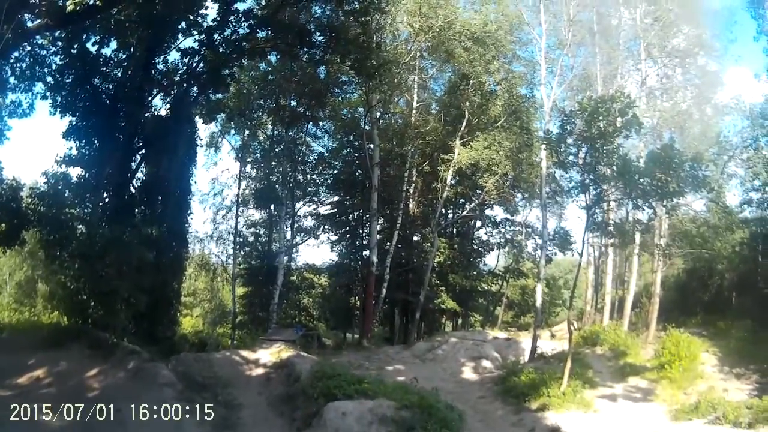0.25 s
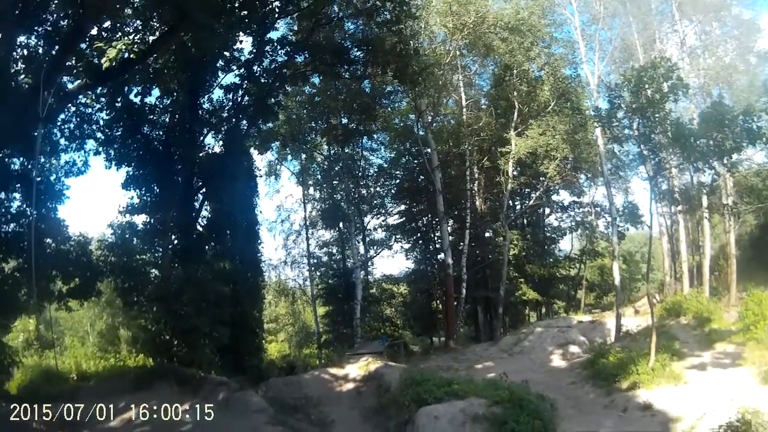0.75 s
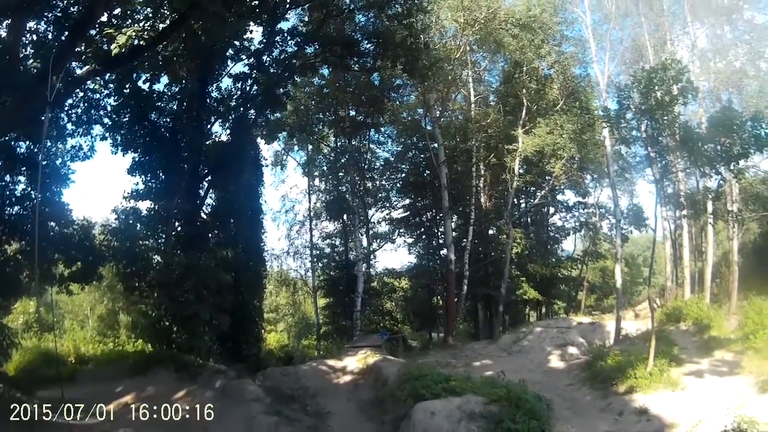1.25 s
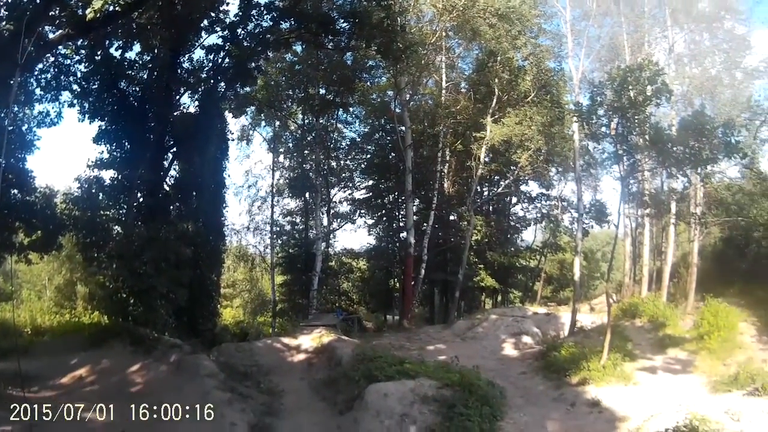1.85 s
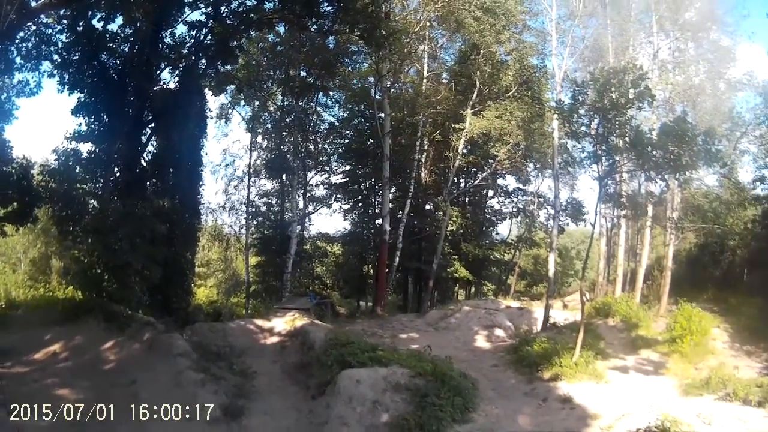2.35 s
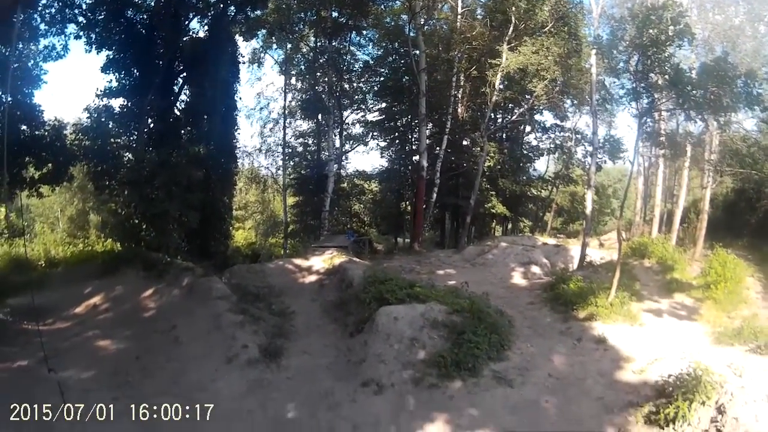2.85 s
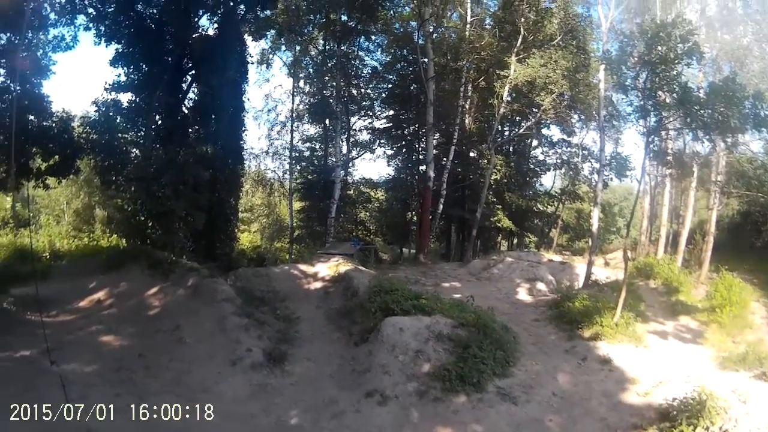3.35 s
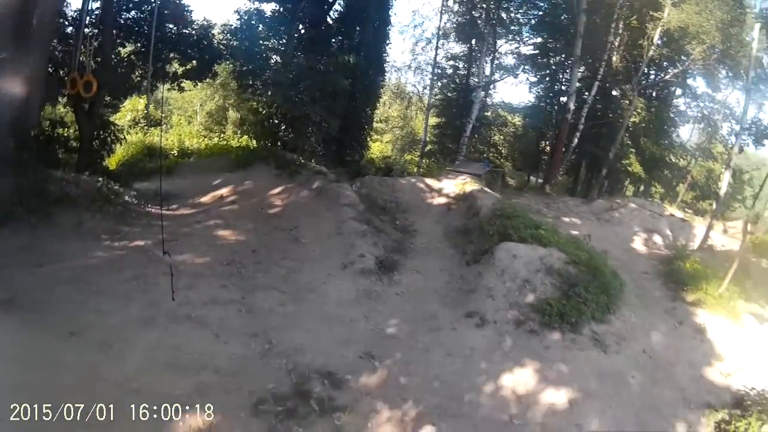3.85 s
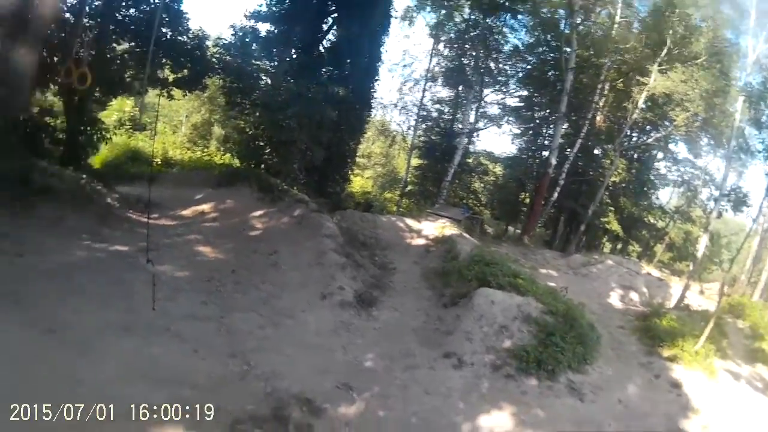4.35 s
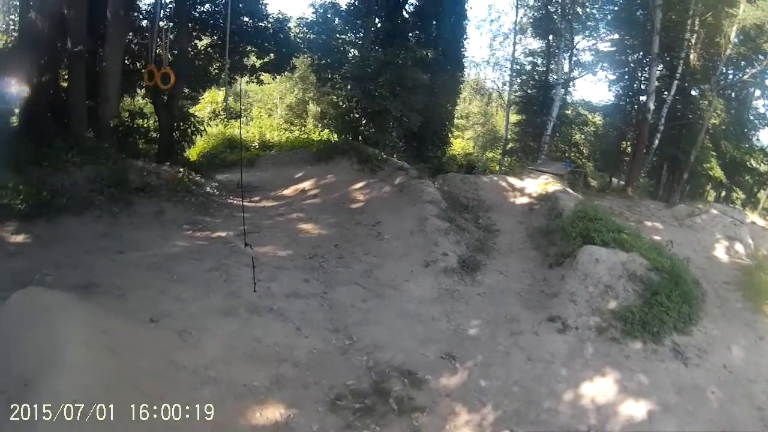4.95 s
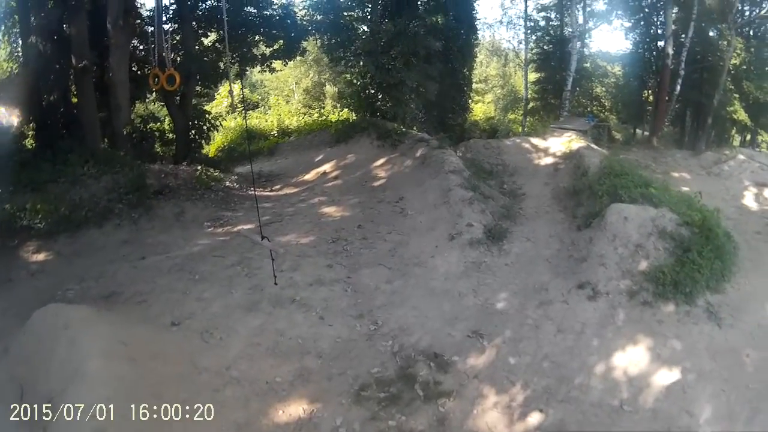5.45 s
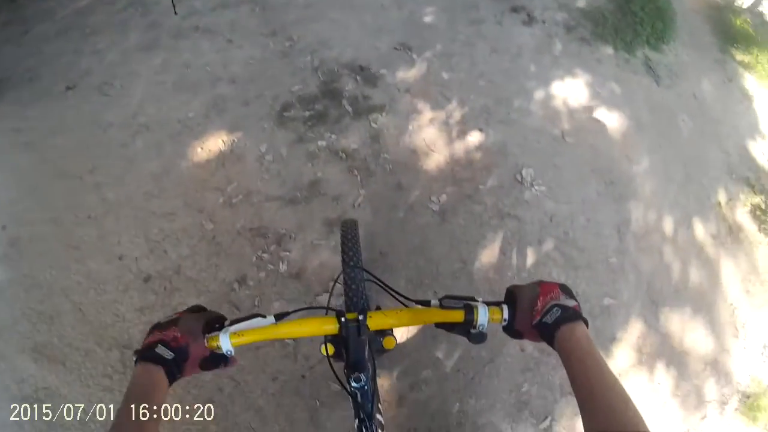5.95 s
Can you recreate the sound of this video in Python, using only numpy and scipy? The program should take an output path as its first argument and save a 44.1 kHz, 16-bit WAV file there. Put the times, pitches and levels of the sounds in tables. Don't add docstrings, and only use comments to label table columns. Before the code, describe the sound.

A close, dry, bumpy handling sound from a microphone inside a helmet-mounted camera on a bike ride in woods. Low rumble, strap rubbing and steady hiss run throughout, with a very thin high whine and a faint fizzing buzz about once a second. From 0.4 to 0.9 s, plastic knocks and ticks tumble over soft low thuds. After a lighter stretch, a heavy boom with a hard knock and bright tick lands at 1.6 s. Smaller rattles follow around 2 s, then a short, deep thump with scuff at 2.65 s. It is quieter near 3 s, with faint distant bird whistles between about 1.7 and 3.9 s. Firm knocks and thuds return at 3.4-3.6 s, then clatter from 4.25 to 4.8 s. The sharpest double crack comes at 5.04 s. Taps and small bumps thin out, one last knock falls at 5.95 s, and it settles.

```python
import sys
import numpy as np
from scipy import signal
from scipy.fft import rfft, irfft
from scipy.io import wavfile
from scipy.ndimage import uniform_filter1d

SR = 44100
rng = np.random.default_rng(int(sys.argv[2]) if len(sys.argv) > 2 else 0)


def gain_from_db(level_db):
    decades = np.asarray(level_db, float) / 20
    return 10 ** decades


def unload_wav(signal):
    wavfile.write(
        sys.argv[1],
        SR,
        np.round(np.clip(np.atleast_2d(signal).T, -1, 1) * 32767).astype(np.int16),
    )


N = 273861

# pitch in Hz, width in Hz, level in dB.
HOUSING_MODES = [(1244, 190, 4), (1385, 329, 5.5), (1510, 252, 3.5), (1932, 172, -1.5), (2252, 166, -1.5)]
# pitch in Hz, width in Hz, level in dB.
SHELL_MODES = [(251, 47, 6.5), (374, 100, 3.5), (589.4, 79, 2), (797, 110, 3.5), (953, 46, -3)]
# pitch in Hz, width in Hz, level in dB.
LATCH_MODES = [(3000, 430, -5.5), (3850, 380, -3.5), (4450, 920, -7), (5500, 2000, -3), (7540, 760, -5.5),
               (9876, 280, -9.5), (11200, 11000, -16)]
# time in seconds, level in dB.
RESTLESSNESS = [(0, -44), (0.2, -54), (0.8, -49), (1.2, -56), (1.68, -50), (1.8, -47.5), (1.97, -43.5),
                (2.2, -50.5), (2.55, -48), (2.9, -61), (3.66, -46.5), (3.74, -56), (4.2, -55), (4.4, -47.5),
                (4.6, -47), (5.0, -45), (5.42, -50.5), (6.21, -58)]
# centre in seconds, change in dB, half length in seconds.
STILL_MOMENTS = [(0.313, -6, 0.16), (1.257, -7, 0.055), (2.24, -10, 0.032), (2.464, -8, 0.077),
                 (2.81, -5.5, .06), (3.713, -5.5, 0.052), (4.55, -6, 0.044), (4.84, -11.5, 0.047),
                 (5.513, -17, 0.046), (5.893, -5, 0.047), (6.168, -10, 0.09)]
# centre in seconds, peak in dB, half length in seconds.
STRAP_SCUFFS = [(0.653, -53.5, 1), (1.958, -43.5, 0.075), (0.526, -52, 0.031), (2.65, -38.5, 0.06),
                (4.926, -44, 0.046), (1.641, -38.5, 0.061), (3.63, -52, 0.35), (3.993, -59.5, 0.43),
                (4.352, -48, 0.4), (5, -40, 0.12), (5.411, -47, 0.2)]
# frequency in Hz, density in dB per Hz.
HISS_SPECTRUM = [(100, 5.5), (300, 7.5), (1000, -3.5), (2500, -6.5), (5000, -9), (8000, -9.5), (13000, -10),
                 (15800, -13)]
# crest in seconds, peak in dB, pitch in Hz, rise in ms, fall by 8 dB in ms.
HELMET_THUDS = [(0.404, -29.5, 124, 5, 2.5), (0.473, -21, 73.5, 11, 15), (0.592, -25, 71, 13, 14),
                (0.695, -30.5, 115, 7.5, -1.5), (1.518, -35.5, 99, 20, 12), (1.617, -14, 109.8, 13, 37),
                (1.635, -13, 88, 14, 25), (1.944, -26.5, 95, 8.8, 10), (1.979, -28, 102, 14, 7.5),
                (2.073, -23.5, 102, 12.5, 7), (2.65, -13.5, 115.6, 3.7, 4), (3.39, -26.5, 102, 23, 8),
                (3.44, -19.5, 92.6, 17, 22), (3.579, -14, 86, 11, 22), (4.278, -16.5, 79.5, 41, 10),
                (4.313, -31, 92.3, 66, 46), (4.335, -23.5, 98.4, 1.9, 22), (4.953, -19, 98, 5.2, 12),
                (5.017, -18, 81.6, 19, 18), (5.048, -23.5, 90, 12, 24.5), (5.34, -29.5, 97, 12.6, 13),
                (5.384, -29, 91.4, 17, 26), (2.313, -40, 102.5, 31, 44), (5.959, -32, 108, 20, 26)]
# crest in seconds, peak in dB, pitch in Hz.
HELMET_NODS = [(0.006, -43, 83), (0.122, -36, 110), (0.631, -36, 88.7), (0.716, -39, 115),
               (0.848, -38.5, 114), (1.023, -42.5, 91), (1.303, -41, 102.5), (1.343, -37.5, 103),
               (1.4, -36.5, 100), (1.76, -34, 105), (1.805, -37.5, 105), (2.537, -45, 78.4),
               (2.681, -44, 112), (3.1, -37.5, 93), (3.925, -47.5, 110), (4.131, -39, 88.5),
               (4.632, -38, 121.4), (4.689, -33.5, 67), (4.985, -44, 80.4), (5.213, -34.5, 84),
               (5.587, -41, 79), (5.784, -37.5, 106)]
# start in seconds, peak in dB, brightness in Hz.
BUCKLE_TICKS = [(0.0446, -42, 4300), (0.5015, -37, 5230), (0.6368, -41.5, 3990), (0.68, -33.5, 3050),
                (0.819, -41.5, 3500), (0.844, -42, 3400), (1.1047, -49.5, 5360), (1.607, -37.5, 3720),
                (1.6342, -19, 4575), (1.709, -46, 4210), (1.919, -38.5, 4670), (2.0862, -30.5, 4890),
                (2.3231, -36, 4250), (3.58, -43.5, 3370), (3.591, -32.5, 3040), (3.6245, -27, 4690),
                (4.374, -35, 3060), (4.4768, -37, 3800), (4.627, -35.5, 3880), (5.4413, -49, 5500),
                (4.7863, -33, 3280), (4.944, -33, 3890), (4.9812, -39.5, 3780), (5.0388, -25, 3168),
                (5.3436, -51.5, 5330), (5.1082, -40, 5650), (5.152, -38.5, 4100), (5.58, -38, 4700),
                (5.9556, -35.5, 3850), (0.397, -46.5, 4280), (0.708, -43.5, 4080), (1.468, -54, 5040),
                (2.7172, -50, 5500), (3.226, -55, 3930), (3.429, -41.5, 3550), (4.255, -47, 4660),
                (4.957, -41, 4680), (5.449, -52, 3500), (5.601, -42, 4500), (5.78, -47.5, 3680),
                (1.624, -50, 5000), (1.659, -47, 3500), (2.783, -52, 4530), (2.678, -44, 4500),
                (3.299, -52, 5500), (4.321, -25, 4450), (4.325, -41, 3560), (1.703, -40, 3600),
                (3.546, -43, 4140), (1.612, -51, 4800), (1.667, -49, 3200), (4.948, -52, 4030),
                (2.328, -39, 3320), (2.667, -33, 3800), (0.493, -45, 5330), (2.114, -36, 4320),
                (5.407, -46.5, 4730)]
# start in seconds, peak in dB, brightness in Hz.
FURTHER_TICKS = [(0.3626, -55, 3600), (0.4964, -38, 4920), (0.5054, -48, 4200), (0.7134, -45, 3400),
                 (0.8604, -52, 3800), (1.6494, -41, 4300), (0.758, -47, 4920), (1.8711, -51, 3700),
                 (1.9994, -43, 4760), (2.0204, -50, 3730), (2.0685, -48, 5230), (2.0734, -47, 3700),
                 (2.166, -55, 3820), (2.6574, -42, 4500), (4.6334, -34, 4100), (5.1644, -53, 4300),
                 (5.2769, -48, 3300), (0.7795, -47, 4860)]
# start in seconds, peak in dB, length in ms, tick level in dB against the knock.
LATCH_RATTLES = [(0.473, -41, 2.7, -5), (0.4905, -39.5, 12, 9.5), (0.724, -40, 5.9, -2),
                 (0.755, -34.5, 5.7, -5.5), (0.777, -47, 6.4, 4), (1.649, -39.5, 11.5, -7),
                 (1.6962, -38, 5.7, 8), (1.958, -50, 0.67, 0), (1.9995, -36, 2.1, -9),
                 (2.1085, -34.5, 4.2, 7), (2.1441, -34, 6.9, -7), (2.3162, -35.5, 8.4, 5),
                 (2.6501, -32.5, 5.8, 2), (2.6602, -29, 6.77, 7), (3.1173, -42, 2.4, -4),
                 (3.391, -32, 4.3, 7.5), (3.54, -37, 1.6, -3), (3.565, -35.5, 6.5, 1),
                 (3.629, -42, 1.95, -4), (4.2642, -33.5, 2.3, 8), (4.3198, -30.5, 2.7, 0.5),
                 (4.3278, -30.5, 11, -1), (4.5223, -33, 3, -8), (4.537, -34, 5.6, -8.5),
                 (4.7114, -37, 1.4, -5), (4.7772, -31.5, 2.96, -6), (4.965, -37, 2, -2),
                 (5.145, -35.5, 3.64, 5.5), (5.409, -48, 1.6, -22), (5.5703, -36.5, 12.5, -11.5)]
# start in seconds, peak in dB, loudest part in Hz.
STRAP_TAPS = [(0.045, -40, 1790), (0.361, -45, 1580), (0.602, -42, 1310), (0.645, -38, 2090),
              (1.056, -41.5, 1410), (1.115, -40, 1470), (1.177, -39, 1400), (1.439, -38, 1880),
              (1.501, -36, 1300), (1.656, -39, 1460), (1.678, -37, 1780), (1.742, -39, 1480),
              (1.751, -36.5, 1455), (1.805, -40, 1820), (2.097, -37, 1930), (2.165, -41, 1440),
              (2.292, -48, 1990), (2.396, -38, 1320), (5.3442, -41.5, 1500), (2.468, -35, 1820),
              (2.578, -39.5, 1880), (2.69, -39, 1770), (2.708, -43.5, 1980), (2.771, -48, 1980),
              (2.782, -36, 1950), (3.268, -33, 1910), (3.296, -38.5, 1360), (3.452, -44.5, 1530),
              (3.508, -42, 1340), (4.114, -41, 1840), (4.156, -41.5, 1760), (4.55, -36.5, 1590),
              (4.594, -41, 1570), (5.162, -36.5, 1620), (5.274, -34, 1260), (5.427, -49, 1320),
              (5.47, -42.5, 1590), (5.477, -54, 1770), (5.544, -41, 1540), (5.625, -36, 1380),
              (5.634, -35.5, 1410), (5.801, -35.5, 1440),
              (0.268, -45.5, 2130), (0.94, -44, 1300), (1.273, -45, 1510), (1.385, -42, 1510),
                   (1.469, -42, 1630), (1.84, -39, 1470), (3.04, -47.5, 1560), (3.282, -38, 1350),
                   (3.309, -44, 1830), (5.455, -41.5, 1850), (5.55, -37.5, 1372), (5.904, -50, 1490),
                   (6.059, -47.5, 1900)]
# start in seconds, peak in dB, loudest part in Hz, length in ms, low body in dB against the peak.
HOUSING_KNOCKS = [(0.3949, -24.5, 1420, 5.54, -16.5), (0.6786, -20, 1820, 3.34, -10.5),
                  (0.8173, -27, 1800, 3.8, -13.5), (0.8429, -29, 1890, 4.8, -14.5),
                  (1.602, -25, 1500, 5.3, -14), (1.606, -14.5, 1404, 4.4, -18),
                  (1.6231, -27, 1370, 12.2, -8), (1.6284, -23.5, 1400, 4.9, -13),
                  (2.0843, -30, 2020, 0.64, -10), (2.642, -30.5, 1220, 0.98, -2.5),
                  (3.424, -15.5, 1180, 5.14, -9), (3.578, -28, 1820, 4.3, -8),
                  (3.5896, -24.5, 1640, 5.7, -10), (3.6228, -31.5, 1850, 1.3, -8),
                  (4.274, -30.5, 1780, 1.58, -13.5), (4.372, -27.5, 1700, 6.4, -8),
                  (4.4756, -29, 1860, 4.7, -9.5), (4.6245, -24, 1670, 3.1, -9.5),
                  (4.632, -26, 1660, 4.5, -7.5), (4.786, -24, 1730, 3.1, -13),
                  (4.943, -30.5, 1730, 7.8, -5.5), (4.9821, -25.5, 1530, 7.3, -27),
                  (5.0381, -14, 1364, 3, -12), (5.0386, -12.5, 1890, 4.22, -27),
                  (5.0744, -27, 1630, 10.4, -16.5), (5.951, -28, 1530, 6.85, -5.5)]
# start in seconds, peak in dB, length in ms, low body in dB against the peak.
MOUNT_BUMPS = [(0.6256, -37, 4.2, -15), (0.691, -33, 2.2, -27), (0.707, -43, 3.2, -2),
               (0.712, -39.5, 7.4, -4), (0.858, -43.5, 9.7, -12), (1.2936, -42, 6.1, -10),
               (1.305, -37, 12, -11), (1.319, -34.5, 9.4, -6.5), (1.3956, -39, 3.25, -19.5),
               (1.8699, -38.5, 3.8, -28), (2.0183, -39.5, 4.4, -34), (2.0684, -40, 2.6, -10),
               (2.679, -34.5, 1.6, -13), (4.7256, -41, 5.8, 0), (4.8893, -44, 8.8, 0),
               (4.9557, -37, 6.6, -32), (5.0147, -39, 6.3, -10), (5.0992, -40, 26, -14),
               (5.369, -37.5, 9.2, -6), (5.599, -44, 5.3, -9), (5.653, -40, 6.5, -11.5),
               (5.281, -46, 3.6, -0.5), (5.703, -58, 5.5, 9.5), (0.7775, -36.5, 3, -9),
               (0.668, -58, 2.5, -17), (3.377, -53, 2.8, 2), (5.02, -44.5, 3.4, -4),
               (5.028, -46.5, 4.3, -18), (2.331, -68, 5.3, -15), (0.713, -51, 2.7, -19),
               (5.7609, -36, 7.5, -6), (5.779, -40.5, 4.2, -4)]
# start in seconds, peak in dB, pitch in Hz.
MOUNT_TWISTS = [(0.394, -33.5, 250), (0.679, -30, 253), (1.604, -27, 280), (1.934, -48, 232.3),
                (2.061, -54, 233), (2.146, -40, 252), (2.641, -24, 239), (3.593, -30.5, 250),
                (4.328, -36, 184), (4.374, -31.5, 247), (4.472, -36.5, 262), (4.634, -52, 191),
                (4.786, -32.5, 255), (4.889, -41, 243), (4.945, -40, 193), (4.982, -31.5, 251),
                (5.037, -25, 269), (5.145, -39, 290), (5.275, -46, 282), (5.702, -43.5, 234),
                (5.76, -44.5, 281), (5.949, -35.5, 206)]
# start in seconds, peak in dB, pitch in Hz.
HELMET_SHRUGS = [(0.392, -57, 130), (0.464, -47, 129), (0.689, -37, 145), (1.293, -38, 141),
                 (1.577, -58, 129), (1.624, -16.5, 137.6), (1.741, -33.5, 129), (1.843, -43, 149),
                 (1.933, -27.5, 127.7), (2.058, -32, 132), (2.318, -34.5, 130.5), (2.64, -19.5, 138),
                 (3.421, -34, 129), (3.566, -30.5, 132), (4.259, -27.5, 137), (4.324, -47, 130),
                 (4.445, -53.5, 151), (4.626, -57, 129), (4.768, -37.5, 140), (4.941, -51, 129),
                 (5.03, -30, 183), (5.948, -34, 131)]
# start in seconds, length in seconds, start pitch in Hz, end pitch in Hz, level in dB.
FAR_BIRDS = [(2.046, 0.026, 3750, 3880, -59), (1.706, 0.018, 4260, 4200, -59),
             (2.327, 0.073, 4316, 3850, -60.5), (2.39, 0.097, 3915, 3900, -67),
             (2.721, 0.029, 4650, 4420, -65), (3.069, 0.11, 3950, 3480, -67.5),
             (3.164, 0.044, 3790, 3930, -65.5), (3.46, 0.07, 3830, 3970, -60),
             (3.802, 0.077, 3880, 3720, -67), (5.225, 0.045, 3170, 3200, -76),
             (6.022, 0.083, 3024, 3084, -71)]


def place(starts_s, sounds):
    out = np.zeros(N + SR)
    at = np.maximum(np.round(np.asarray(starts_s) * SR).astype(int), 0)
    np.add.at(out, at[:, None] + np.arange(sounds.shape[1]), sounds)
    return out[:N]


def rms_one(x):
    return x / np.sqrt(np.mean(x ** 2) + 1e-20)


def peak_one(sounds):
    return sounds / np.abs(sounds).max(axis=1, keepdims=True)


def resonance(x, hz, width_hz):
    r = np.exp(-np.pi * width_hz / SR)
    gain = (1 - r * r) / 2
    return signal.lfilter(np.array([1, 0, -1]) * gain, [1, -2 * r * np.cos(2 * np.pi * hz / SR), r * r], x + 1e-18)


def ring_modes(x, modes, widen=1):
    return sum(gain_from_db(db) * resonance(x, hz, widen * width_hz) for hz, width_hz, db in modes)


def band(x, low_hz, high_hz, order=2):
    return signal.sosfilt(signal.butter(order, [low_hz, high_hz], "band", fs=SR, output="sos"), x)


def low_pass(x, hz, order):
    return signal.sosfilt(signal.butter(order, hz, fs=SR, output="sos"), x)


def drift(rate_hz):
    r = np.exp(-2 * np.pi * rate_hz / SR)
    return rms_one(signal.lfilter([1], [1, -2 * r, r * r], rng.standard_normal(N + SR))[SR:])


def struck(contact, modes, centre_hz, focus_db, scatter_db):
    out = 0
    for k, (hz, width_hz, level_db) in enumerate(modes):
        octaves_off = np.abs(np.log2(hz / centre_hz))
        scatter = scatter_db * rng.standard_normal(len(contact))
        strength = gain_from_db(level_db - focus_db * octaves_off + scatter)
        out = out + (-1) ** k * strength[:, None] * resonance(contact, hz, width_hz)
    power = uniform_filter1d(out ** 2, size=90, axis=1)
    return out / np.sqrt(power.max(axis=1, keepdims=True))


def chatter(length_s, rise, rough_db, strike):
    u = np.arange(1500) / SR / length_s[:, None]
    impacts = rng.standard_normal(u.shape)
    impacts *= gain_from_db(rough_db * np.clip(rng.standard_normal(u.shape), -2, 2))
    impacts *= u ** rise * np.exp(-u)
    impacts /= np.sqrt(np.sum(impacts ** 2, axis=1, keepdims=True))
    crest = np.clip(rise * length_s * SR, 0, 1400).astype(int)
    impacts[np.arange(len(u)), crest] += strike * np.exp(-length_s / 0.0033)
    return impacts


def rubbing(blows, booms):
    t = np.arange(N) / SR
    restless_db = np.interp(t, *np.transpose(RESTLESSNESS))
    stillness_db = sum(db * np.exp(-((t - s) / half) ** 2) for s, db, half in STILL_MOMENTS)
    rumble = gain_from_db(restless_db + stillness_db)
    rub = gain_from_db(-65 + restless_db + 45)
    scuff = sum(gain_from_db(db) * np.exp(-np.abs(t - s) / half * 7.5) for s, db, half in STRAP_SCUFFS)
    fade = np.exp(-1 / (0.018 * SR))
    shake = np.sqrt(signal.lfilter([1 - fade], [1, -fade], blows ** 2))

    slips = rng.random(N) < 2000 / SR
    slips = slips * gain_from_db(3.2 * np.minimum(rng.exponential(1, N), 4))
    slips = slips * rng.choice([-1, 1], N)
    slips = slips * gain_from_db(4.2 * drift(45))
    ring = band(ring_modes(slips, HOUSING_MODES), 1120, 2350, order=4)
    ring += gain_from_db(-3) * ring_modes(slips, SHELL_MODES, widen=2)
    ring = low_pass(ring, 2600, 4)
    crisp = slips * gain_from_db(4.5 * drift(80))
    latch = ring_modes(crisp, LATCH_MODES[:3])
    ring = low_pass(ring + gain_from_db(-5.5) * latch, 4700, 4)
    drag = gain_from_db(-23.5) * scuff * rms_one(band(latch, 2700, 4700, order=3))

    push = rng.standard_normal((2, N)) * gain_from_db(2.0 * drift(29))
    sway = rumble * rms_one(resonance(push[0], 78.0, 26))
    jerk = gain_from_db(-4) * rumble + gain_from_db(-14) * uniform_filter1d(np.abs(booms), size=1500)
    lurch = jerk * rms_one(band(push[1], 9.3, 58))
    return (rub + scuff + gain_from_db(-28.5) * shake) * rms_one(ring) + drag + sway + lurch


def electronics():
    hz, level_db = np.transpose(HISS_SPECTRUM)
    log_hz = np.log(np.fft.rfftfreq(N, 1 / SR) + 1)
    shape = gain_from_db(np.interp(log_hz, np.log(hz), level_db))
    hiss = gain_from_db(-65.5) * rms_one(irfft(rfft(rng.standard_normal(N)) * shape, N))
    t = np.arange(N) / SR
    flutter = 1 + 0.5 * np.sin(2 * np.pi * 36 * t)
    whine = gain_from_db(-81.5) * np.sqrt(2) * np.sin(2 * np.pi * 9525 * t) * flutter
    writing = uniform_filter1d(1.0 * (np.abs(t % 1 - 0.55) < 0.105), size=400)
    noise = rng.standard_normal(N)
    buzz = rms_one(band(noise, 11240, 11500))
    buzz += gain_from_db(-2.0) * rms_one(band(noise, 9400, 9700))
    buzz += gain_from_db(-7.0) * rms_one(band(noise, 13300, 14800))
    return hiss + whine + gain_from_db(-76.0) * writing * buzz


def thuds():
    nod_rise_ms, nod_fall_ms, lead_s = 13.3, 12, 0.06
    nods = [(*row, nod_rise_ms, nod_fall_ms) for row in HELMET_NODS]
    s, peak_db, hz, rise_ms, fall_ms = np.transpose(HELMET_THUDS + nods)[:, :, None]
    flex_db = -20 + 0.95 * (hz - 95) - 0.44 * (peak_db + 24.5)
    t = np.arange(9000) / SR - lead_s
    rise = np.exp(-(t / (rise_ms * 0.00049)) ** 2)
    fall = 1 / np.cosh(t / (fall_ms * 0.00066))
    swell = np.where(t < 0, rise, fall)
    chance = rng.random((len(s), 3))
    boom = np.sin(2 * np.pi * (hz * (t - 2.0 * t * np.abs(t)) + chance[:, :1]))
    flex_hz = 125 + 130 * chance[:, 1:2]
    flex = np.sin(2 * np.pi * (flex_hz * t + chance[:, 2:]))
    return place(s[:, 0] - lead_s, gain_from_db(peak_db) * swell * (boom + gain_from_db(flex_db - 6) * swell ** 1.5 * flex))


def ticks(rows):
    s, peak_db, hz = np.transpose(rows)
    hard = np.clip((hz - 3700) / 2200, 0, 1)[:, None]
    length_s = 0.0011 * (1 + 0.99 * (1 - hard[:, 0]) ** 2)
    contact = chatter(length_s, rise=0.14, rough_db=6, strike=2.0)
    soft = low_pass(contact, 4500, 2)
    ring = struck(soft + hard * (contact - soft), LATCH_MODES, hz, focus_db=11.5, scatter_db=3.0)
    first_instant = contact * np.exp(-np.arange(1500) / SR / 0.00028)
    crack = rms_one(band(first_instant, 1530, 9500, order=3))
    body = sum((-1) ** k * resonance(contact, f, 2 * w) for k, (f, w, _) in enumerate(HOUSING_MODES[2:]))
    tick = ring + gain_from_db(-19.5) * (0.16 + hard) * crack + gain_from_db(-8.5) * peak_one(body)
    muffled = low_pass(tick, 6000, 4)
    openness = np.clip(2 * hard, 0, 1) ** 2
    return place(s, gain_from_db(peak_db - 2.5)[:, None] * (muffled + openness * (tick - muffled)))


def taps():
    s, peak_db, hz = np.transpose(STRAP_TAPS)
    contact = chatter(0.001877 + 0 * s, rise=0.536, rough_db=7.5, strike=0.42)
    contact = band(contact, 300, 5060, order=3)
    modes = SHELL_MODES + HOUSING_MODES + LATCH_MODES[:4]
    return place(s, gain_from_db(peak_db - 9.5)[:, None] * struck(contact, modes, hz, focus_db=14.5, scatter_db=3.5))


def knocks():
    rattles = [(s + 0.001005, db, 1820, ms, -12.5 - 0.86 * tick_db) for s, db, ms, tick_db in LATCH_RATTLES]
    bumps = [(s, db, 1600, ms, low_db) for s, db, ms, low_db in MOUNT_BUMPS]
    s, peak_db, hz, ms, low_db = np.transpose(HOUSING_KNOCKS + rattles + bumps)
    raw = chatter(ms * 0.0004936, rise=0.491, rough_db=6.4, strike=1.7)
    jar = peak_one(band(ring_modes(raw, LATCH_MODES[:4]), 3100, 6000, order=3))
    contact = low_pass(raw, 2500, 4)
    padded = np.clip((1650 - hz) / 500, 0, 1)[:, None]
    contact = contact + padded * (low_pass(contact, 1500, 2) - contact)
    hollow = struck(contact, HOUSING_MODES, hz, focus_db=16.0, scatter_db=2)
    slap = struck(contact, [(740, 550, 0)], 800 + 0 * hz, focus_db=0, scatter_db=0)
    dull = struck(contact, SHELL_MODES, 650 + 0 * hz, focus_db=8.5, scatter_db=2.5)
    low = signal.sosfilt(signal.butter(2, 330, "high", fs=SR, output="sos"), dull + gain_from_db(-2) * slap)
    knock = hollow + gain_from_db(-22.5) * jar + gain_from_db(low_db + 3.0)[:, None] * low
    return place(s, gain_from_db(peak_db - 1.5)[:, None] * knock)


def twists():
    s, peak_db, hz = np.transpose(MOUNT_TWISTS + HELMET_SHRUGS)[:, :, None]
    lead_s, lag_s = 0.03, 0.00632
    t = np.arange(4000) / SR - lead_s
    cycles = np.where(t < 0, 0.6, 1.7)
    swell = 1 / np.cosh(t * hz / cycles)
    ring = np.sin(2 * np.pi * (hz * t + rng.random((len(s), 1))))
    return place(s[:, 0] + lag_s - lead_s, gain_from_db(peak_db - 3.5) * swell * ring)


def birds():
    out, blur = np.zeros(N), drift(130)
    for s, length_s, start_hz, end_hz, level_db in FAR_BIRDS:
        u = np.clip((np.arange(N) / SR - s) / length_s, 0, 1)
        hz = start_hz + (end_hz - start_hz) * u
        swell = np.sin(np.pi * u) ** 0.5 * (0.65 + 0.55 * blur)
        out += gain_from_db(level_db - 2) * swell * np.sin(2 * np.pi * np.cumsum(hz) / SR)
    return out


def scene():
    rattles = [(s + 0.0028, db + tick_db, 4100 + 67 * tick_db) for s, db, _, tick_db in LATCH_RATTLES]
    blows = knocks() + ticks(BUCKLE_TICKS + rattles) + taps()
    booms = thuds() + twists()
    blows = blows - 0.65 * resonance(blows, 1090, 170)
    mix = blows + booms + rubbing(blows, booms) + birds() + electronics() + ticks(FURTHER_TICKS)
    return mix[None]


def roll_off(x):
    return signal.sosfilt(signal.butter(12, 15830, fs=SR, output="sos"), x)


def record(dry):
    cut = signal.sosfilt(signal.cheby2(20, 50, 16050, fs=SR, output="sos"), dry)
    return roll_off(cut)


dry = scene()
out = record(dry)
unload_wav(out)
```